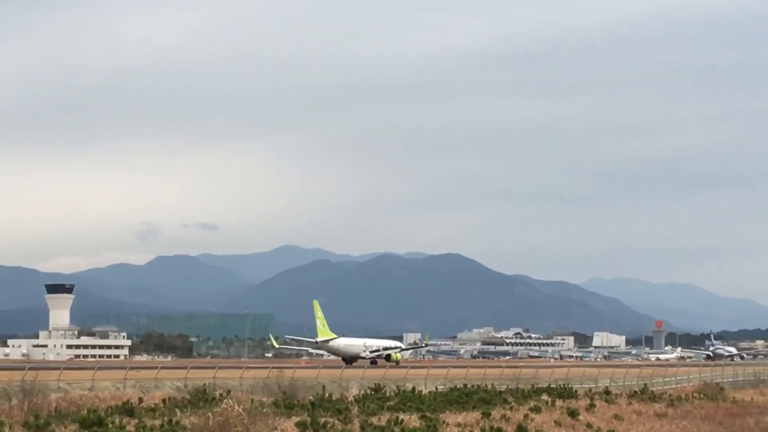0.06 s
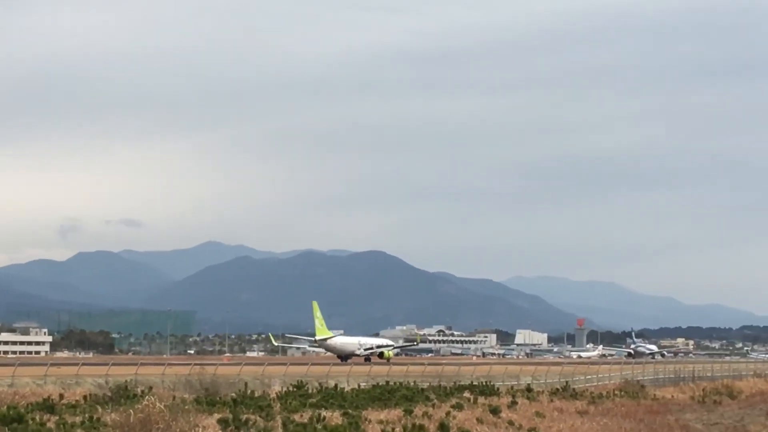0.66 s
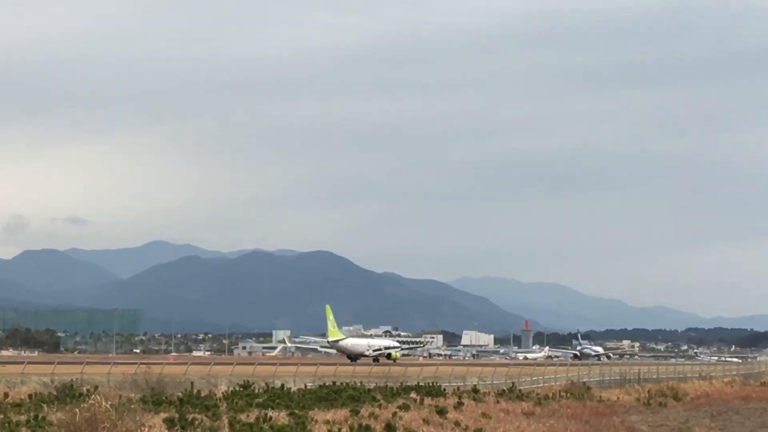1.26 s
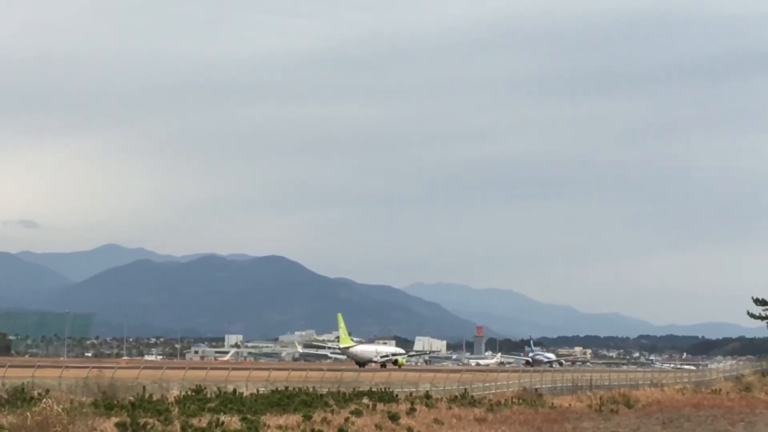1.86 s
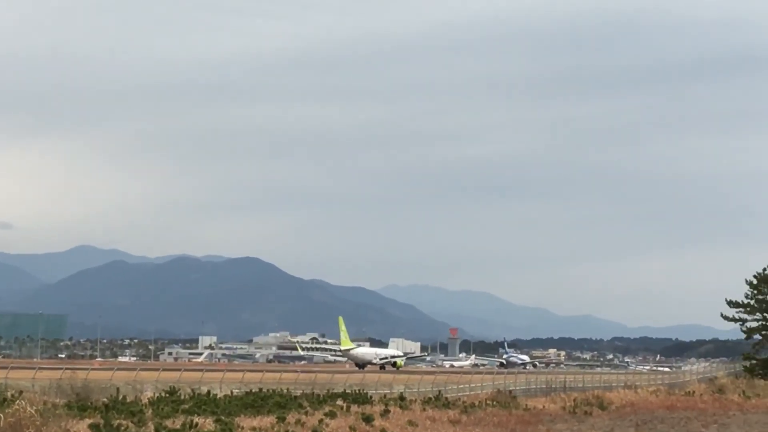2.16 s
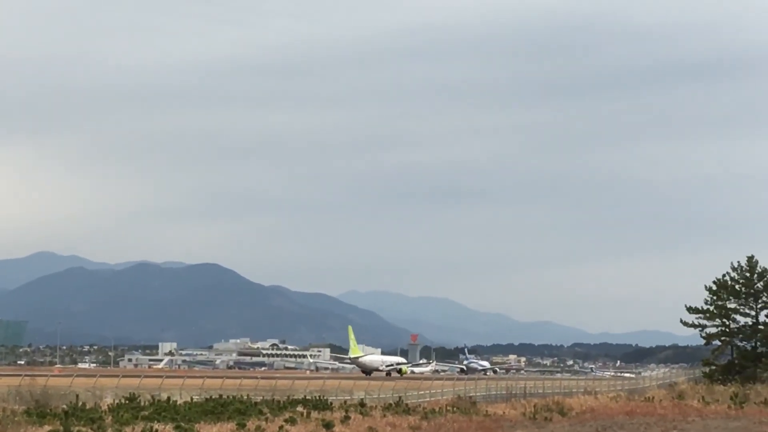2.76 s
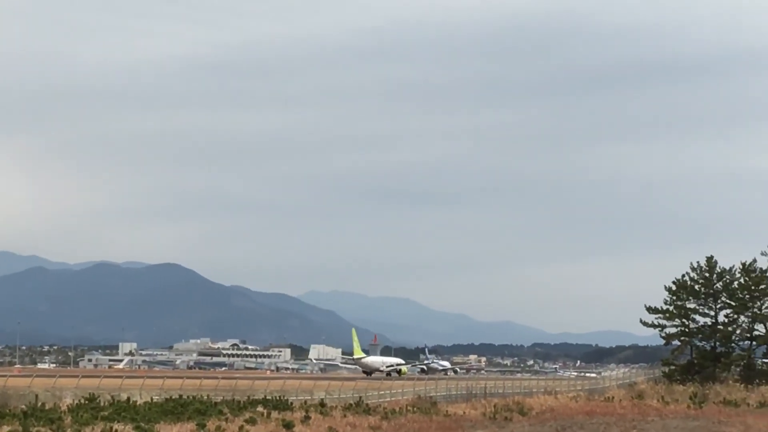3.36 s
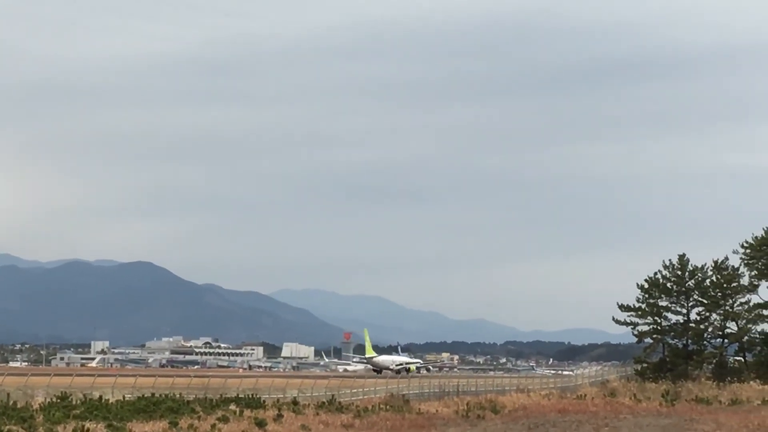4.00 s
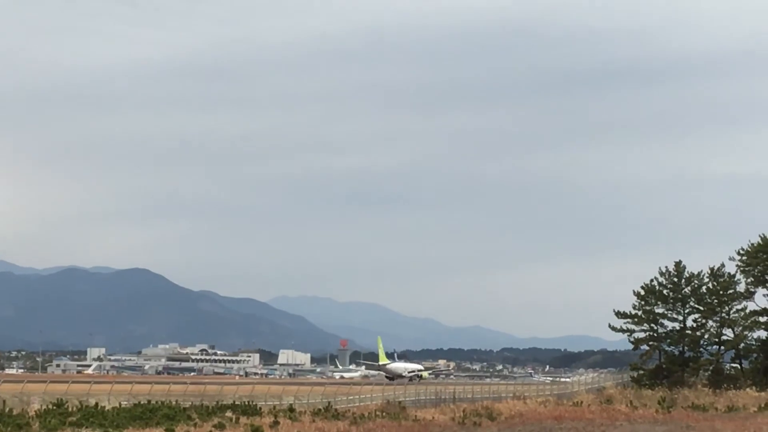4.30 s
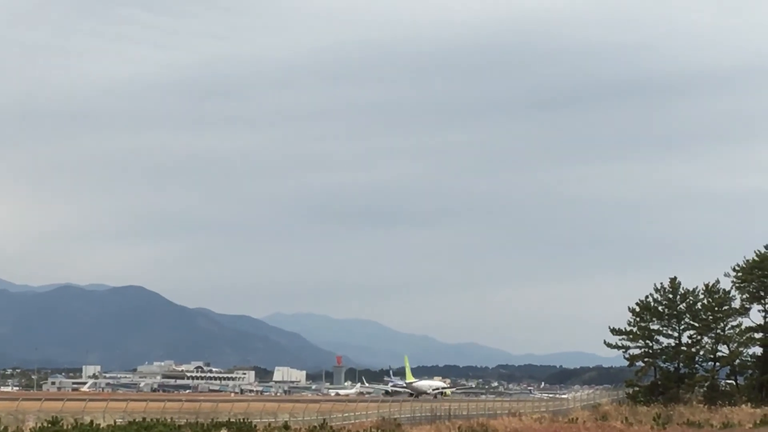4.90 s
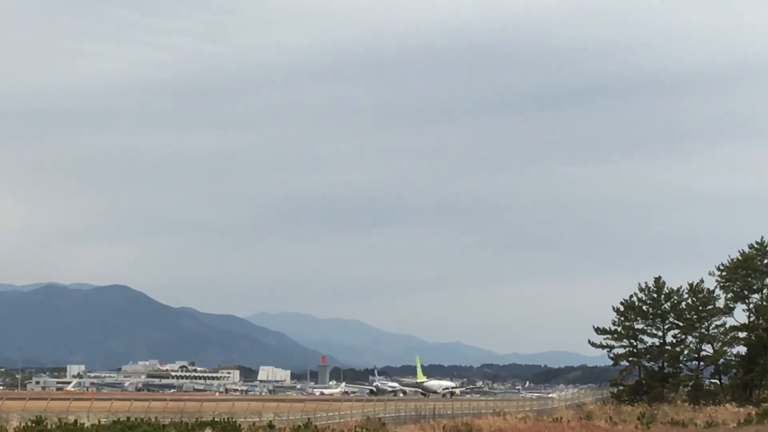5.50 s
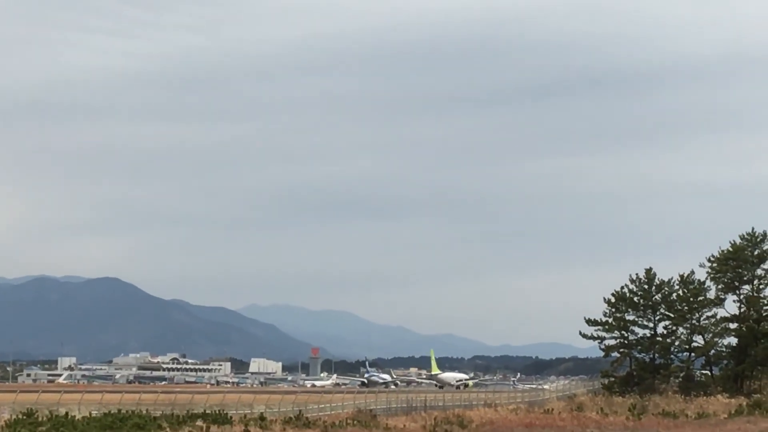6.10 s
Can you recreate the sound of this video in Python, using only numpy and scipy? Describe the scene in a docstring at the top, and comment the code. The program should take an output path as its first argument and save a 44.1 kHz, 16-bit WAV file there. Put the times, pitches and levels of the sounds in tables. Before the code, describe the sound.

A jet airliner rolls away down a runway after landing, heard from far across an open grass field. Its broad, rushing roar is present from the start and is loudest at about 0.7 seconds, with a slight sizzling edge until 1.5 seconds. From about 2 seconds the roar steadily fades and dulls, and a subtle whoosh slides down in pitch between 2 and 3 seconds. Underneath, a deep exhaust rumble throbs unevenly, swelling around 0.5 and 2.8 seconds, with brief gusts near 1, 1.9, 2.7 and 4.2 seconds. A very faint, even hiss lies close to the microphone, with a few tiny ticks and scratches near 0.4 seconds, between 1.4 and 1.9, and at 5. By the end, at about 6 seconds, the jet is a much quieter, muffled, distant rush.

```python
"""A jet airliner rolls away down a runway under reverse thrust, heard from far across a grass field.
Its jets roar as they mix with the air. The roar fades and dulls with distance, and an echo off the
ground cancels part of its low middle range. Under it, big slow swirls of exhaust make a gusty rumble.
A faint hiss with a few tiny ticks lies close to the microphone."""
import sys
import numpy as np
from scipy import signal
from scipy.fft import rfft, irfft, next_fast_len
from scipy.io import wavfile
from scipy.ndimage import uniform_filter1d

SR = 44100
rng = np.random.default_rng(int(sys.argv[2]) if len(sys.argv) > 2 else 0)


def dump(signal):
    """Clip the signal to [-1, 1] and save it as 16-bit WAV at the path in sys.argv[1]."""
    limited = np.clip(np.atleast_2d(signal).T, -1, 1)
    pcm = np.round(limited * 32767).astype(np.int16)
    wavfile.write(sys.argv[1], SR, pcm)


N = 275625
TIME = np.arange(N) / SR
FRAME, HOP = 2048, 256  # the roar is shaped in short frames: their length and spacing in samples
FRAME_TIME = np.arange(N // HOP + 2) * HOP / SR
BIN_HZ = np.fft.rfftfreq(FRAME, 1 / SR)

# The roar swells, then fades as the aircraft rolls on. Each row: time in seconds, level in dB.
ROAR_LEVEL = [(0, -26.0), (0.7, -23), (1.8, -24.5), (2.45, -28.5), (3.1, -30.5), (4.4, -34.5), (5.0, -37.5),
              (5.7, -41.2), (6.25, -44)]
# The tone of the jets at middle distance. Each row: frequency in Hz, relative level in dB.
ROAR_SPECTRUM = [(20, -44), (120, -23), (230, -7.5), (350, -5), (500, -4), (750, -3.5), (950, -0.37),
                 (1280, 0.5), (1750, -3.5), (2400, -11.5), (3000, -16.5), (4000, -29), (4600, -40.5),
                 (6500, -63), (9000, -88.5)]
# The band the ground echo changes, mostly by cancelling it.
# Each row: time in seconds, centre in Hz, gain in dB.
GROUND_ECHO = [(0, 400, -1.5), (1.15, 308, -8), (1.9, 416, -8), (2.35, 440, -4), (3.3, 250, -0.8),
               (4.4, 290, -2.3), (6.25, 250, 3.5)]
# A faint whoosh: one boosted band slides down and settles as the aircraft moves.
# Each row: time in seconds, centre in Hz, gain in dB.
WHOOSH = [(0, 1650, 0.8), (1.9, 1390, 1), (2.25, 940, 3.5), (3.2, 524, 2), (5.3, 570, 1.4),
          (6.25, 600, 1.5)]
# The rumble's two slow swells. Each row: time in seconds, deep bass in dB, upper bass in relative dB.
RUMBLE_LEVELS = [(0, -22.1, -29.5), (0.45, -21, -25.5), (1.45, -26, -41), (2.1, -27, -41),
                 (2.8, -24.5, -33.5), (3.55, -28.5, -31.5), (4.25, -32, -40.5), (4.7, -33.5, -40.5),
                 (5.35, -39.5, -47.5), (5.85, -44, -46.5), (6.25, -38, -49.5)]
# The tone of the big exhaust swirls. Each row: frequency in Hz, relative level in dB.
RUMBLE_SPECTRUM = [(10, -51.5), (22, -36), (33, -11), (48, -5), (62, 4), (80, 3.5), (100, -2.5),
                   (135, -9.5), (170, -18.5), (220, -28), (400, -54.5), (1000, -92)]
# The strongest gusts in the deep bass. Each row: peak time in seconds, gain in dB, length in seconds.
GUSTS = [(.5, 5.5, 0.039), (1.045, 5.5, 0.083), (1.365, 3, 0.11), (1.906, 5.5, 0.042), (2.684, 9, 0.037),
         (2.847, 4.5, .07), (4.155, 6.5, 0.042)]
# The slow swell of the hiss. Each row: time in seconds, relative level in dB.
HISS_LEVEL = [(0, -77), (1.5, -74.5), (2.6, -74), (4.8, -70.5), (6.25, -72)]
# The tone of the hiss. Each row: frequency in Hz, relative level in dB.
HISS_SPECTRUM = [(20, -15.5), (1000, 1.5), (4500, 0.5), (6300, 1.5), (9500, 1), (11500, -2), (13500, -4.5),
                 (15700, -7.5)]
# Tiny ticks and scratches close by.
# Each row: time of the peak in seconds, level in dB, centre in Hz, width in Hz, length in seconds.
NEAR_TICKS = [(.401, -59, 8000, 3970, 0.0015), (1.443, -68.5, 8000, 3020, .04),
              (1.605, -69, 8500, 1800, .045), (1.89, -71, 7550, 2200, 0.043),
              (4.995, -64, 12500, 1800, .008)]
# Steady peaks and dips in the sound at the microphone. Each row: centre in Hz, width in Hz, gain in dB.
PEAKS_AND_DIPS = [(430, 70, 1.2), (610, 70, 1.1), (730, 90, -1.4), (890, 90, .9), (1030, 120, -1.5),
                  (1230, 130, 1.3), (1385, 80, 1.9), (1510, 100, -1), (1680, 120, 1.1), (2400, 240, -1.1),
                  (4950, 350, -4), (7600, 1200, -1.6), (10400, 550, -5)]


def jet_roar(shimmer_db=0.8, waver_db=0.34):
    """Noise of the jets mixing with air, dulled by distance and stirred by moving air on the way."""
    level_db = follow(ROAR_LEVEL, FRAME_TIME[:, None])[0]
    tone_db = spectrum_at(ROAR_SPECTRUM, BIN_HZ) + air_dulling(level_db) + sizzle() + reflections()
    # moving air makes narrow bands swell and fade
    shape = gain_of(tone_db + shimmer_db * random_patches(frames=18, bins=5))
    # the middle of the roar sets its level, which then wavers a little in broad bands
    core = (BIN_HZ > 750) & (BIN_HZ < 2000)
    core_level = np.sqrt((shape[:, core] ** 2).sum(1, keepdims=True) / len(BIN_HZ))
    shape *= gain_of(level_db) / core_level
    shape *= gain_of(waver_db * random_patches(frames=24, bins=70))
    white = signal.stft(rng.standard_normal(N), nperseg=FRAME, noverlap=FRAME - HOP)[2]
    shaped = white * shape[:white.shape[1]].T
    return signal.istft(shaped, nperseg=FRAME, noverlap=FRAME - HOP)[1][:N]


def air_dulling(roar_db, runway_m=295, start_past_m=47, speed_m_per_s=58.4, loss_db_per_m=0.127):
    """The roar's change of tone in dB: air soaks up more treble as the aircraft gets farther away."""
    path_m = np.hypot(runway_m, start_past_m + speed_m_per_s * FRAME_TIME[:, None])
    treble_db = -36.3 - loss_db_per_m * (path_m - path_m[0])
    middle_distance_db = -15.5  # treble compared with the roar at middle distance
    # no effect below 1300 Hz, the stated loss at 3000 Hz, and more above that
    weight = np.clip((BIN_HZ - 1300) / (3000 - 1300), 0, 2.25)
    return weight * (treble_db - roar_db - middle_distance_db)


def sizzle(boost_db=3.5, end_s=1.5, fade_s=0.3):
    """A boost in dB high in the roar, strong while the engines are side-on to the listener."""
    side_on = 0.5 - 0.5 * np.tanh((FRAME_TIME[:, None] - end_s) / fade_s)
    return boost_db * side_on * band(centre_hz=4870, octaves=0.35)


def reflections(rebound_ratio=2.21, rebound_share=0.39):
    """Gain in dB: the ground echo cancels one band and adds about an octave up; a whoosh slides down."""
    dip_hz, dip_db = follow(GROUND_ECHO, FRAME_TIME[:, None])
    whoosh_hz, whoosh_db = follow(WHOOSH, FRAME_TIME[:, None])
    dip = dip_db * band(dip_hz, octaves=0.94)
    rebound = -rebound_share * dip_db * band(rebound_ratio * dip_hz, octaves=0.32)
    return dip + rebound + whoosh_db * band(whoosh_hz, octaves=0.32)


def exhaust_rumble(split_hz=110, upper_trim_db=-0.5):
    """Swirls of exhaust throb at random under two slow swells; the biggest arrive as gusts."""
    deep_db, upper_db = follow(RUMBLE_LEVELS, TIME)
    swirls = noise(RUMBLE_SPECTRUM)
    deep = filtered(swirls, lambda hz: -20 * np.log10(1 + (hz / split_hz) ** 10))
    return (gain_of(deep_db + gusts()) * steadied(deep, span_s=0.12)
            + gain_of(upper_db + upper_trim_db) * steadied(swirls - deep, span_s=0.14))


def gusts(lull_after_s=0.069, lull_s=0.041, lull_share=0.8):
    """Gain of the deep bass in dB: each gust swells, then leaves a short lull."""
    return sum(db * (bell(TIME, s, length / 2) - lull_share * bell(TIME, s + lull_after_s, lull_s / 2))
               for s, db, length in GUSTS)


def hiss(boost_db=5.0):
    """A thin, even hiss close by."""
    return gain_of(follow(HISS_LEVEL, TIME)[0] + boost_db) * noise(HISS_SPECTRUM)


def ticks():
    """Short, faint scratches of high noise."""
    out = np.zeros(N)
    for s, db, centre_hz, width_hz, length in NEAR_TICKS:
        scratch = filtered(rng.standard_normal(N), lambda hz: 30 * bell(hz, centre_hz, 2 * width_hz))
        out += gain_of(db) * bell(TIME, s, length / 2) * unit_level(scratch)
    return out


def gain_of(db):
    """Turns decibels into a number to multiply by."""
    return 10 ** (np.asarray(db) / 20)


def unit_level(x):
    """Scales x to an average (rms) level of one."""
    return x / np.sqrt(np.mean(x ** 2) + 1e-20)


def spectrum_at(rows, hz):
    """A spectrum table's dB at hz, joining its rows by straight lines on a pitch scale."""
    row_hz, db = np.transpose(rows)
    return np.interp(np.log(hz + 1), np.log(row_hz + 1), db)


def follow(rows, t):
    """Each value column of a time table at the times t."""
    s, *columns = np.transpose(rows)
    return [np.interp(t, s, column) for column in columns]


def bell(x, centre, width):
    """A smooth hump of height one."""
    return np.exp(-0.5 * ((x - centre) / width) ** 2)


def band(centre_hz, octaves):
    """A smooth hump over the frequencies around centre_hz."""
    return bell(np.log2(BIN_HZ + 1), np.log2(centre_hz), octaves)


def filtered(x, db_at):
    """Filters x by a function that gives dB at each frequency."""
    size = next_fast_len(len(x) + FRAME)
    gain = gain_of(db_at(np.fft.rfftfreq(size, 1 / SR)))
    return irfft(rfft(x, size) * gain, size)[:len(x)]


def noise(spectrum):
    """Steady noise with the given spectrum."""
    return unit_level(filtered(rng.standard_normal(N), lambda hz: spectrum_at(spectrum, hz)))


def steadied(x, span_s):
    """Holds the level near one over each span, leaving the faster flutter."""
    size = int(span_s * SR)
    power = uniform_filter1d(uniform_filter1d(x ** 2, size), size)
    return x / np.sqrt(abs(power) + 1e-12)


def random_patches(frames, bins):
    """Random ups and downs, smooth over so many time frames and frequency bins."""
    field = rng.standard_normal((len(FRAME_TIME), len(BIN_HZ)))
    for axis, width in ((0, frames), (0, frames), (1, bins), (1, bins)):
        field = uniform_filter1d(field, width, axis)
    return unit_level(field)


def scene(fade_s=0.001):
    """The far aircraft and the near hiss and ticks in one channel, with a tiny fade at each end."""
    edges = np.clip(np.minimum(TIME, TIME[-1] - TIME) / fade_s, 0, 1)
    return (edges * (jet_roar() + exhaust_rumble() + hiss() + ticks()))[None]


def record(dry, cutoff_hz=15750):
    """Steady peaks and dips colour the sound at the microphone, then the highest treble is cut off."""
    heard = filtered(dry[0], lambda hz: sum(db * bell(hz, centre, width / 2)
                                            for centre, width, db in PEAKS_AND_DIPS))
    low_pass = signal.firwin(1023, cutoff_hz, window=("kaiser", 9), fs=SR)
    return signal.oaconvolve(heard, low_pass, "same")[None]


dry = scene()
out = record(dry)
dump(out)
```